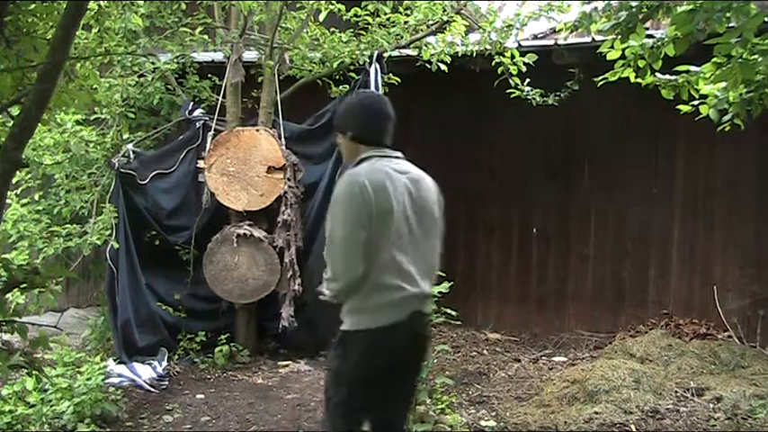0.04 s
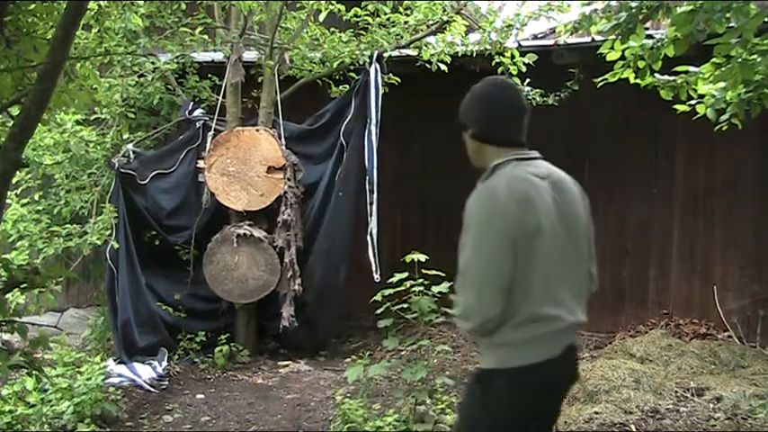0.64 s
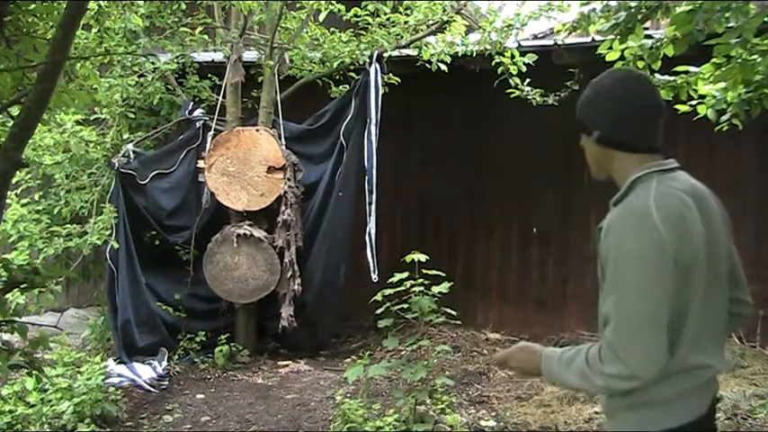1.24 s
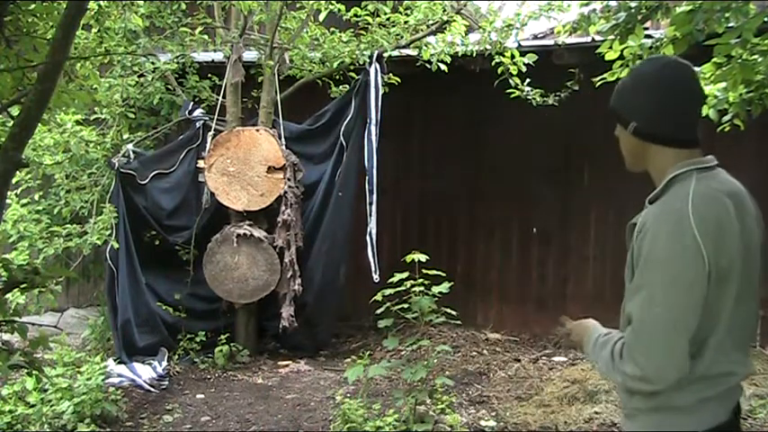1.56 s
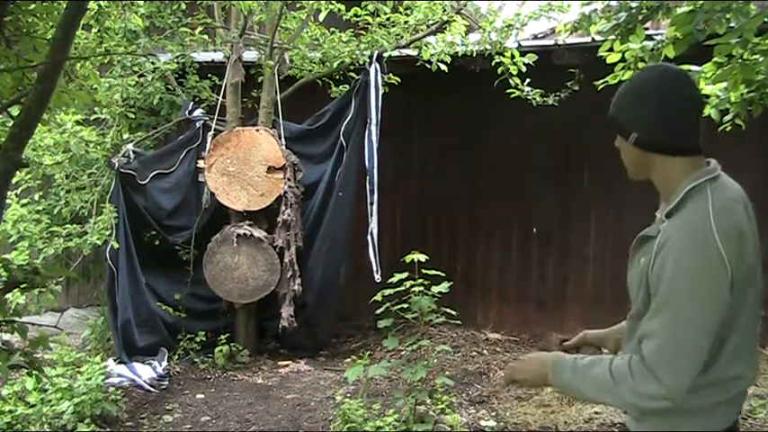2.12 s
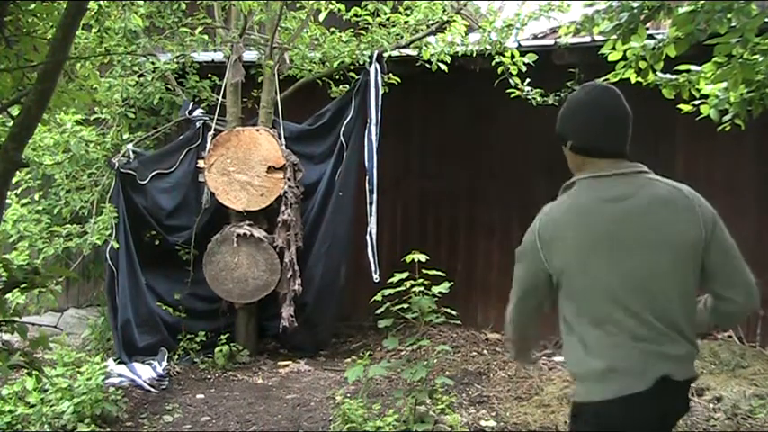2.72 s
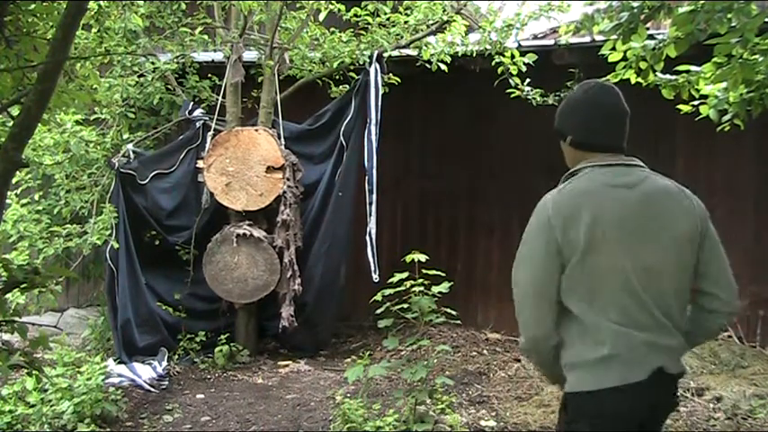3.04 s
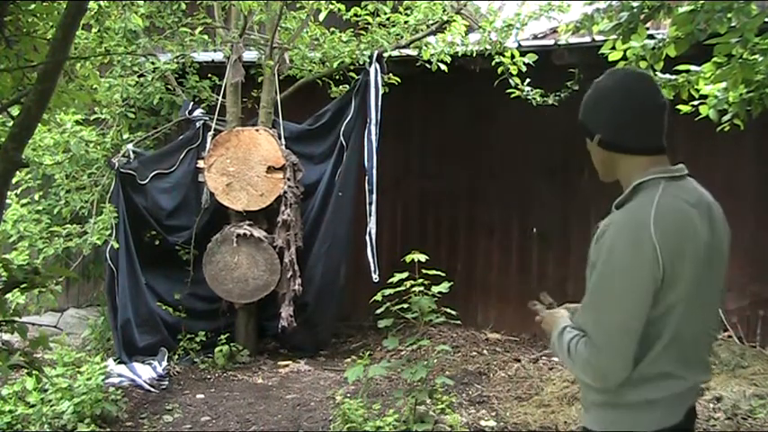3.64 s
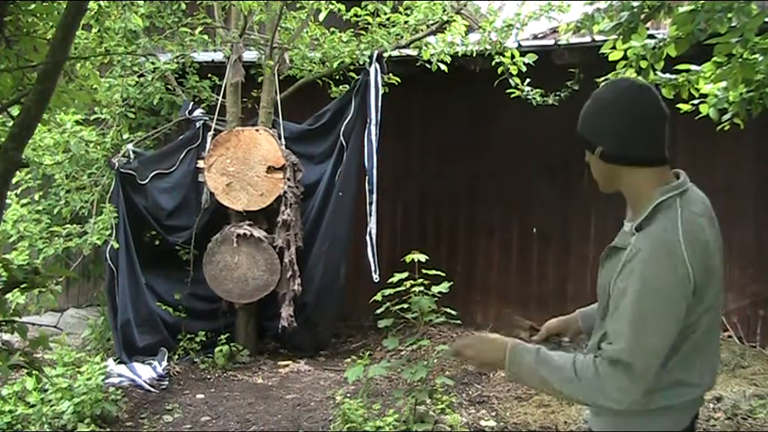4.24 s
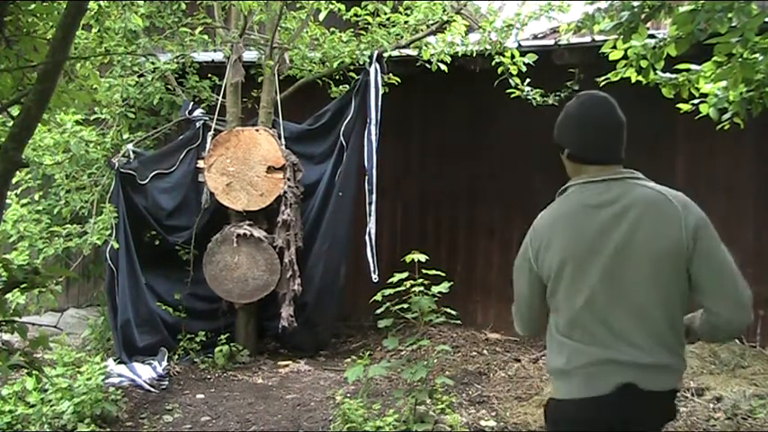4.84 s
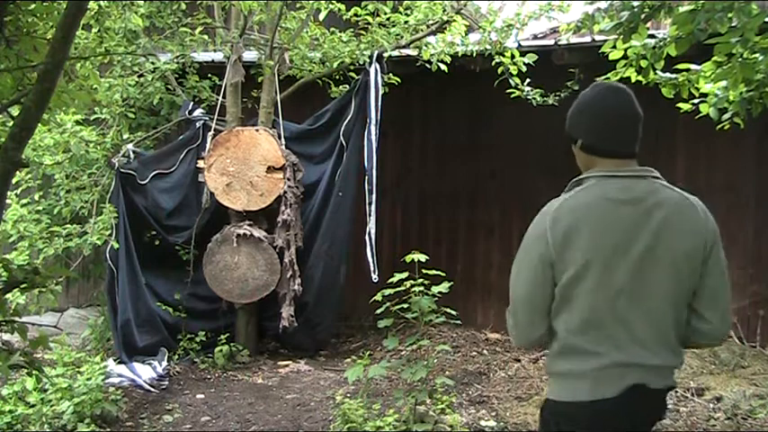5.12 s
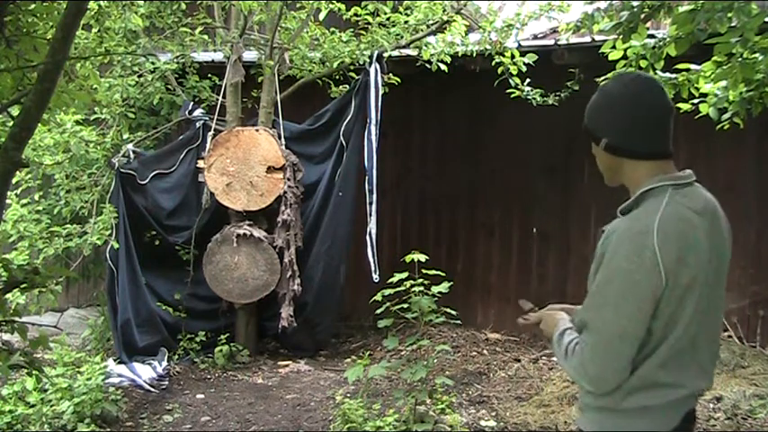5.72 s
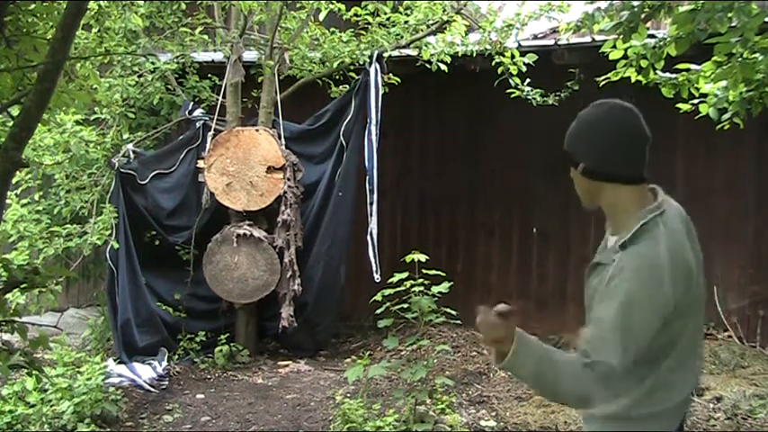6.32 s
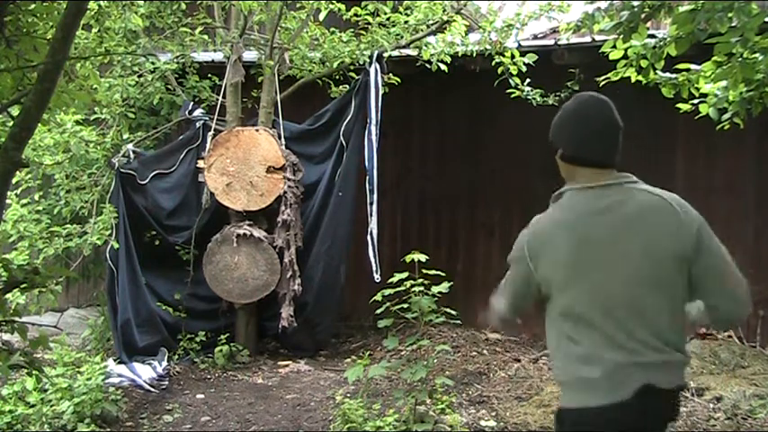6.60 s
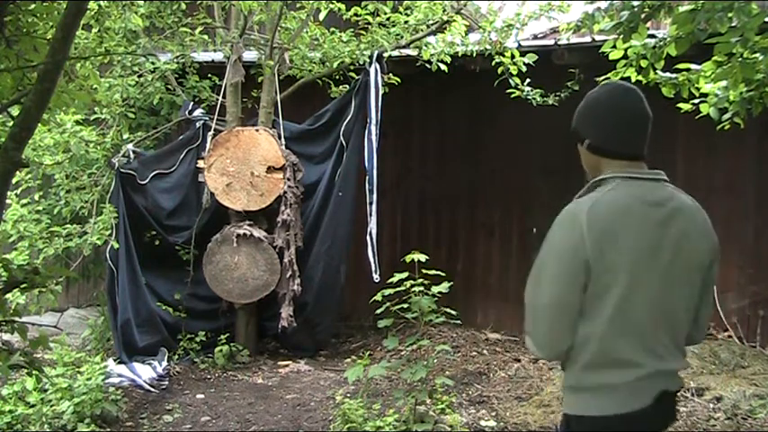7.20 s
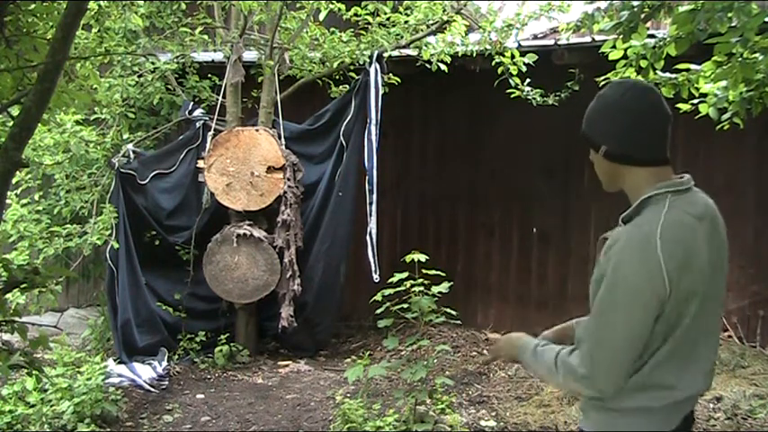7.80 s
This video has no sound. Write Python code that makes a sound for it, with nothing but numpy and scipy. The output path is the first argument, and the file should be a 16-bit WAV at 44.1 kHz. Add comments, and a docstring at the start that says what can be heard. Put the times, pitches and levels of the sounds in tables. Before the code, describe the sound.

A quiet outdoor yard, with a faint steady hush of distant traffic and leaves and a barely audible engine drone coming and going. During the first second, spare knives clink lightly close to the microphone while footsteps crunch over dry litter and clothing rustles; two twigs snap around 1.3 seconds. At 2.8 seconds a thrown knife bites into a log straight ahead with a loud, sharp, splintering crack and a short wooden thud. Twigs snap underfoot just after 3 seconds. Two more knives strike at 4.8 and 6.7 seconds, the last the loudest. Each hit echoes briefly off a fence and walls, with a very faint quiver of the blade. Sleeves swish softly around every throw, and a quiet step follows. A blackbird whistles in the trees, mostly in the first second and from 4.5 to 6.2 seconds, and a smaller bird adds faint chips.

```python
"""Knife throwing in a leafy yard

Ahead of a close pair of microphones, three thrown knives bite into a hanging log round: fibres tear,
the wood thuds, the blade quivers, and a fence and farther walls throw each crack back. Close by, the
thrower steps over dry litter, his sleeves swish and the spare knives clink in his hand. Beyond, a
blackbird and a smaller bird sing in the trees over the hush of distant traffic and one droning engine."""
import sys
import numpy as np
from scipy import signal
from scipy.fft import rfft, irfft, next_fast_len
from scipy.io import wavfile

SR = 44100
rng = np.random.default_rng(int(sys.argv[2]) if len(sys.argv) > 2 else 0)


def to_wav(sig):
    """Store sig (one row per channel, or 1-D mono) as 16-bit WAV at the path in sys.argv[1].

    Samples outside -1..1 are clipped; the rate is SR.
    """
    pcm = np.clip(np.atleast_2d(sig), -1, 1) * 32767
    pcm = np.round(pcm).astype(np.int16)
    wavfile.write(sys.argv[1], SR, pcm.T)  # frames by channels


N = 346626
T = np.arange(N) / SR
RING_T = T[:SR // 2]


def undb(db):
    """Decibels to gain."""
    return 10 ** (np.asarray(db) / 20)


def unit(x):
    """Scale to rms 1."""
    return x / np.sqrt(np.mean(x ** 2))


def over_bins(points):
    """Spread (frequency [Hz], value) points over the bins of a full-length spectrum."""
    return np.interp(np.fft.rfftfreq(N, 1 / SR), *np.transpose(points))


def colour(x, points):
    """Causal filter through (frequency [Hz], level [dB]) points; white noise keeps its power."""
    size = next_fast_len(len(x) + 2048, True) // 2 * 2
    octave = np.log2(np.maximum(np.fft.rfftfreq(size, 1 / SR), 1))
    hz, db = np.transpose(points)
    gain = unit(undb(np.interp(octave, np.log2(hz), db)))
    cepstrum = irfft(np.log(gain))
    cepstrum[1:size // 2] *= 2  # fold to minimum phase
    cepstrum[size // 2 + 1:] = 0
    return irfft(rfft(x, size) * np.exp(rfft(cepstrum)))[:len(x)]


def band(x, low_hz, high_hz, order=2):
    """Band-pass between two edges."""
    return signal.sosfilt(signal.butter(order, [low_hz, high_hz], "band", fs=SR, output="sos"), x)


def fade(t60):
    """Exponential decay, 60 dB down after t60 seconds."""
    return np.exp(-np.log(1000) * RING_T / t60)


def swell(s, db, rise_s, decay_s):
    """Gain that grows to a peak at time s and dies away."""
    return undb(db) * np.exp(np.minimum((T - s) / rise_s, (s - T) / decay_s))


def ring(modes):
    """Impulse response of (frequency [Hz], level [dB], t60 [s]) modes."""
    return sum(undb(db) * fade(t60) * np.sin(2 * np.pi * hz * RING_T) for hz, db, t60 in modes)


def burst(decay_s):
    """Dying noise of unit energy."""
    x = rng.standard_normal(len(RING_T)) * np.exp(-RING_T / decay_s)
    return x / np.linalg.norm(x)


def grains(spread_db):
    """Dense clicks of very uneven size, rms 1."""
    noise = rng.standard_normal(N)
    sizes = np.minimum(rng.exponential(size=N // 32 + 1), 5)
    return unit(noise * undb(spread_db * np.repeat(sizes, 32)[:N]))


def add(track, s, x):
    """Mix a sound into a track at time s."""
    i = max(int(s * SR), 0)
    track[i:i + len(x)] += x[:N - i]


def through(x, response):
    """Convolve, keeping the length."""
    return signal.fftconvolve(x, response)[:len(x)]


def stereo(mid, side, pan_db):
    """Mid and side to left and right; a positive pan leans left."""
    return np.array([(mid + side) * undb(pan_db / 2), (mid - side) * undb(-pan_db / 2)])


# trunks, fence and leaves around the microphones: (low edge [Hz], high edge [Hz],
# relative early level [dB], early t60 [s], relative late level [dB], late t60 [s])
YARD_SCATTER = [(59.7, 750, -9, .12, -11.5, 0.54), (690, 2390, -4, 0.11, -15.5, 1),
                (3210, 6400, -4.5, 0.23, -18, 0.55), (6700, 10800, -1.5, 0.18, -24, 0.11)]
def scatter(early_db, late_db):
    """Quick reflections from nearby and a faint long tail, without the direct sound."""
    t = T[:SR]
    onset = 1 - np.exp(-(t / 0.00068) ** 2)
    out = np.zeros(SR)
    for low_hz, high_hz, near_db, near_t60, far_db, far_t60 in YARD_SCATTER:
        for db, t60 in ((near_db + early_db, near_t60), (far_db + late_db, far_t60)):
            shape = np.exp(-np.log(1000) * t / t60) * onset
            tail = rng.standard_normal(SR) * shape / np.linalg.norm(shape)
            out += undb(db) * band(tail, low_hz, high_hz)
    return out


def yard(x, pan_db, early_db, late_db, width_hz):
    """Place a source before the close pair: reflections differ between the two mostly in the treble."""
    mid = x + through(x, scatter(early_db, late_db))
    highpass = signal.butter(1, width_hz, "high", fs=SR)
    side = through(x, signal.lfilter(*highpass, scatter(early_db, late_db)))
    return stereo(mid, side, pan_db)


# distant traffic and leaves, as they reach the yard: (frequency [Hz], relative level [dB])
HUSH_SPECTRUM = [(15, -37), (25, -15), (53, 0), (129, -4), (188, -5), (221, -7.5), (305, -6), (410, -8),
                 (722, -4), (1950, -12), (2120, -15.5), (2300, -15), (2560, -17.5), (3720, -21),
                 (15500, -45)]
# their width across the pair: (frequency [Hz], relative side level [dB])
HUSH_WIDTH = [(60, -6), (110, -3), (200, 1), (380, 1), (700, -4.5), (1290, -3.5), (2380, -0.5), (4400, 1.5),
              (8120, 4.5), (15000, 6.5)]
def traffic_and_leaves(level_db=-53, recede_db_per_s=-0.3574, waver_db=1.17, rumble_db=2.5):
    """Far traffic, slowly receding, and foliage: the rumble swells and sinks, the hush hardly moves."""
    def hush():
        noise = colour(rng.standard_normal(N), HUSH_SPECTRUM)
        bass = signal.sosfilt(signal.butter(1, 150, fs=SR, output="sos"), noise)
        knots_s = np.linspace(0, T[-1], 70)
        sway, surge = (np.interp(T, knots_s, knots) for knots in rng.standard_normal((2, 70)))
        return bass * undb(rumble_db * surge) + (noise - bass) * undb(waver_db * sway)
    mid = hush()
    side = irfft(rfft(hush()) * undb(over_bins(HUSH_WIDTH) - 0.5), N)
    return undb(level_db + recede_db_per_s * T) * stereo(mid, side, pan_db=1.5)


# one engine far outside the yard: (time [s], frequency [Hz], level [dB])
ENGINE_COURSE = [(0, 58, -86), (1.35, 62, -58), (1.9, 62, -76), (2.6, 61, -57.5), (3.1, 63, -78),
                 (5.1, 72, -68), (6.1, 89, -60), (7, 91, -64), (7.86, 91, -76)]
def far_engine(unsteady=0.53):
    """Only the engine's lowest note carries this far, fading in and out."""
    times, *columns = np.transpose(ENGINE_COURSE)
    hz, db = (np.interp(T, times, column) for column in columns)
    fading = 1 + unsteady * unit(band(rng.standard_normal(N), 2.03, 5.7))
    return undb(db) * unit(fading * np.sin(2 * np.pi * np.cumsum(hz) / SR))


# the blackbird's notes, off in the trees: (time [s], length [s], start pitch [Hz], middle pitch [Hz],
# end pitch [Hz], relative level [dB], trill depth [Hz])
BLACKBIRD_NOTES = [(0, 0.056, 2864, 2710, 2670, -47.5, 186), (0.334, 0.074, 2350, 2260, 2090, -47, 51),
                   (0.416, 0.16, 2200, 2175, 2120, -45, 7), (0.623, 0.053, 1870, 1920, 1970, -51, 8),
                   (.7, 0.037, 3550, 3360, 3320, -44.5, 43), (1.325, 0.29, 2454, 2650, 3330, -57.5, 154),
                   (1.87, 0.098, 2500, 2550, 2620, -55.5, 156), (2.06, 0.062, 2150, 2140, 2140, -60, 56),
                   (2.433, 0.084, 2750, 2840, 2790, -62, 140), (4.533, .12, 2280, 2360, 2297, -48.5, 6),
                   (4.626, 0.081, 2340, 2066, 1645, -50, 13), (4.855, 0.11, 2020, 2013, 2000, -46.5, 13),
                   (5.149, 0.0836, 2735, 2874, 2775, -43.5, 14), (5.229, .06, 2546, 2490, 2430, -47, 18),
                   (5.244, 0.15, 2550, 2498, 2390, -50, 280), (5.668, 0.046, 1613, 1610, 1580, -57, 9.2),
                   (5.888, 0.1, 2900, 2243, 1850, -48.5, 26), (6.004, .14, 2007, 2555, 2547, -48.5, 264)]
# the smaller bird's chips, all one shape: (time [s], pitch [Hz], relative level [dB])
SMALL_BIRD_CHIPS = [(1.51, 4130, -64), (3.541, 3240, -62), (6.23, 7590, -61), (6.23, 4920, -63),
                    (6.28, 4390, -60), (6.306, 6650, -63.5), (6.33, 7620, -69), (6.399, 7440, -67),
                    (6.619, 4470, -57), (6.65, 3430, -57)]
def birds(trill_hz=62, flutter=0.294, canopy_db=-7, canopy_t60=0.69):
    """Gliding, trilled whistles and falling chips waver through the leaves and linger in the trees."""
    out = np.zeros(N)
    chip_s, fall_hz_per_s, chip_depth_hz = 0.031, 6100, 40
    half_fall_hz = fall_hz_per_s * chip_s / 2
    chips = [(s, chip_s, hz + half_fall_hz, hz, hz - half_fall_hz, db, chip_depth_hz)
             for s, hz, db in SMALL_BIRD_CHIPS]
    for s, length_s, start_hz, middle_hz, end_hz, db, depth_hz in BLACKBIRD_NOTES + chips:
        progress = np.linspace(0, 1, int(length_s * SR))
        waver = 1 + flutter * unit(band(rng.standard_normal(SR), 13.2, 71.3))[-len(progress):]
        trill = depth_hz * np.sin(2 * np.pi * np.cumsum(trill_hz * waver) / SR)
        glide = np.polyval(np.polyfit([0, .5, 1], [start_hz, middle_hz, end_hz], 2), progress)
        effort = np.abs(np.sin(np.pi * progress)) ** 0.21 * waver
        add(out, s, undb(db) * unit(effort * np.sin(2 * np.pi * np.cumsum(glide + trill) / SR)))
    near = yard(out, pan_db=2.5, early_db=4, late_db=12, width_hz=3400)
    canopy = np.array([through(out, burst(canopy_t60 / np.log(1000))) for _ in near])
    return undb(-3) * (near + undb(canopy_db) * canopy)


# sleeves close by, alike in every throw (wind-up, follow-through, turning back):
# (time after the hit [s], level [dB], rise [s], decay [s])
ARM_MOVES = [(-.27, -56, 0.18, 0.28), (-.08, -60, 0.083, .14), (.6, -63, 0.1, 0.18)]
# the next knife drawn from the hand: (time [s], level [dB])
KNIFE_DRAWS = [(3.405, -65), (5.907, -67)]
def sleeves_and_fingers(walk_db=-57, walk_db_per_s=-10, walk_end_s=1.07, stop_s=.15, standing_db=-75):
    """Fleece rubs on the walk to the mark and in each throw; a blade hisses over the fingers."""
    walking = undb(walk_db + walk_db_per_s * T) * np.exp(-np.maximum(T - walk_end_s, 0) / stop_s)
    moves = [swell(s + after_s, db, rise_s, decay_s)
             for s, *_ in KNIFE_HITS for after_s, db, rise_s, decay_s in ARM_MOVES]
    rub = np.sqrt(undb(standing_db) ** 2 + walking ** 2 + sum(move ** 2 for move in moves))
    flight_s, release_db, half_slide_s = 0.251, -58.5, 0.019
    releases = [(s - flight_s, release_db) for s, *_ in KNIFE_HITS]
    slide = sum(undb(db) * np.exp(-((T - s) / half_slide_s) ** 2) for s, db in releases + KNIFE_DRAWS)
    return rub * fleece() + slide * unit(band(grains(1.5), 2300, 10000, order=1))


# fleece at close range: (frequency [Hz], relative level [dB])
FLEECE_SPECTRUM = [(300, -3), (1500, 8), (3000, 4), (5000, 1), (7000, -3), (10000, -14), (15000, -11.5)]
def fleece():
    """The steady, grainy rustle of cloth rubbing on cloth."""
    return colour(grains(1.8), FLEECE_SPECTRUM)


# twigs underfoot, near the microphones: (time [s], level [dB], decay [s])
TWIG_SNAPS = [(1.241, -40, 0.012), (1.317, -39, 0.0039), (2.9931, -33, 0.0032), (3.145, -47, .003),
              (3.2344, -37, 0.0029)]
# the tone of a snap: (frequency [Hz], relative level [dB])
TWIG_SPECTRUM = [(200, -14), (900, -7), (1500, 5), (2100, 0.5), (3000, -16), (5000, -13), (9000, -24),
                 (15000, -32)]
def twigs():
    """Now and then a twig snaps under a sole with a short, dry crack."""
    snaps = np.zeros(N)
    for s, db, decay_s in TWIG_SNAPS:
        add(snaps, s, undb(db) * unit(rng.standard_normal(len(RING_T))) * np.exp(-RING_T / decay_s))
    return colour(snaps, TWIG_SPECTRUM)


# the thrower's steps, close by: (time [s], level [dB], rise [s], heel relative to crunch [dB])
FOOTSTEPS = [(.11, -52, 0.022, -15), (0.189, -48, 0.053, -5), (.46, -61, 0.075, -14), (.9, -52, 0.13, -2),
             (1.06, -52, 0.065, -25), (1.25, -46, 0.016, -3), (3.06, -61.5, .13, -2)]
# dry litter on the yard floor: (frequency [Hz], relative level [dB])
LITTER_SPECTRUM = [(150, 1), (600, -7), (1800, 3.5), (3500, -1), (7000, -8.5), (10000, -25.5), (15000, -22)]
def feet(settle_s=0.065):
    """Each sole thuds softly and crushes dry leaves; one more step ends each throw."""
    after_hit_s, recover_db, recover_rise_s, recover_heel_db = 0.378, -56, 0.077, -4
    recoveries = [(s + after_hit_s, recover_db, recover_rise_s, recover_heel_db) for s, *_ in KNIFE_HITS]
    crush, heel = np.zeros((2, N))
    for s, db, rise_s, heel_db in FOOTSTEPS + recoveries:
        weight = swell(s, db, rise_s, settle_s)
        crush += weight
        heel += undb(heel_db) * weight
    crunch = crush * colour(grains(2.5), LITTER_SPECTRUM)
    return crunch + heel * unit(band(rng.standard_normal(N), 59, 780, order=1))


# spare knives touching in the hand, close by: (time [s], relative level [dB])
KNIFE_TOUCHES = [(.102, -39), (.459, -27), (.479, -32), (.828, -32), (1.007, -43.5), (1.035, -45),
                 (3.05, -50), (3.189, -50), (3.418, -50)]
# a free knife, before the hand damps it: (frequency [Hz], level [dB], t60 [s])
FREE_KNIFE_MODES = [(1890, -9.5, 0.15), (3486, -0.5, 0.066), (4000, -19, .1), (5300, 1.5, 0.085),
                    (5780, -9, 0.08), (6336, -11, .08), (6940, -13, 0.033), (7460, -3.5, 0.18),
                    (7300, -18, 0.13), (9850, -12, 0.2), (10460, -20, 0.13), (12800, -13, .07),
                    (14500, -19, 0.055)]
def clinks(scrape_s=0.017, detune=.018, hand_t60=0.079):
    """Steel scrapes briefly on steel and the loose blades ring, damped by the hand."""
    out = np.zeros(N)
    for s, db in KNIFE_TOUCHES:
        contact = burst(scrape_s)
        modes = np.tile(FREE_KNIFE_MODES, (2, 1))  # two blades meet, not quite alike
        modes[:, 0] *= 1 + detune * rng.standard_normal(len(modes))
        chime = through(contact, ring(modes) * fade(hand_t60))
        scrape = band(contact, 3200, 8000) + undb(-19) * band(contact, 8000, 16000)
        add(out, s, undb(db) * (undb(-10) * chime + undb(18.5) * scrape))
    return out


# the fence and walls, nearest first:
# (delay [s], level [dB], smear [s], band centre [Hz], reach above the centre [Hz])
WALL_ECHOES = [(.019, -17, 0.0022, 1240, 4000), (.1, -23, 0.004, 440, 1000), (0.123, -36, 0.024, 455, 70),
               (.196, -19.5, 0.0033, 1400, 900), (.249, -22, 0.00067, 1220, 400)]
def add_echoes(track, s, hit, far_echo_db, far_delay_s=.15):
    """Each wall returns the crack late, smeared and narrowed to a band."""
    for delay_s, db, smear_s, centre_hz, reach_hz in WALL_ECHOES:
        top_hz = centre_hz + reach_hz
        bounce = band(through(hit, burst(smear_s)), centre_hz ** 2 / top_hz, top_hz)
        is_far = delay_s > far_delay_s
        add(track, s + delay_s, undb(db + far_echo_db * is_far) * bounce)


# the log's heavily damped body: (frequency [Hz], level [dB], t60 [s])
LOG_MODES = [(176, -13, 0.025), (402, -14, 0.085), (448, -8, 0.076), (517, 1.5, 0.016), (670, -14, 0.038)]
# the stuck blade and the wood around it: (frequency [Hz], level [dB], t60 [s])
STUCK_BLADE_MODES = [(928, -7, 0.083), (1065, -5.5, 0.048), (1175, -31, 0.068), (1340, -10.5, 0.055),
                     (1584, -37, 0.13), (1620, -47, 0.0088), (2227, -19, 0.077), (2155, -7, 0.012),
                     (2510, -13, 0.039), (2900, -26, 0.011), (3520, -6, 0.018), (3640, -18, 0.018),
                     (5460, -28, 0.011)]
# the stuck knife quivering on: (frequency [Hz], level [dB], t60 [s])
QUIVER_MODES = [(446, -1, 0.24), (1314, -15, 0.33), (2470, 0.5, 0.36), (2556, -7, 0.76), (2610, 0, 0.33)]
# tearing wood fibres, one spectrum a throw: (frequency [Hz], relative level [dB])
SPLINTER_SPECTRA = [
    [(40, -18), (100, -12), (170, -2), (255, -10.5), (380, 6.5), (700, -6), (1050, 3), (1900, -2),
     (3000, -3.5), (4200, -11.5), (5300, -8.5), (6500, -23), (8200, -18), (10000, -32), (15000, -28)],
    [(40, -21), (100, -9), (190, -3), (260, -11.5), (400, 1.5), (750, -6), (1250, 4), (2100, -7.5),
     (3000, -11), (4400, -14.5), (6000, -37), (10000, -47), (15000, -42)],
    [(40, -42), (170, -31), (260, -26), (500, 2), (800, -6.5), (1300, 1), (2500, -4), (3300, -11.5),
     (4800, -17.5), (6400, -15.5), (8500, -29), (10000, -48), (15000, -36)],
]
# hits on the log, straight ahead; each part has its own gain: (time [s], level [dB], lag from tip to
# full blow [s], tip [dB], thud [dB], ring [dB], splinter [dB], quiver [dB], far echo [dB])
KNIFE_HITS = [(2.8051, -14, 0.00223, 12, -3, -2, 22, -49, -8),
              (4.8335, -10, 0.002, 3, 1.5, -3, 19.5, -35, -5),
              (6.711, -7, 0.001434, 12.5, 2.5, -12, 18.5, -35.5, -1.5)]
def knife_hits(radiate_hz=290):
    """The tip ticks in, the blade wedges and kicks the log, fibres tear and the knife quivers."""
    out = np.zeros(N)
    bass_loss = signal.butter(2, radiate_hz, "high", fs=SR, output="sos")  # the round is small
    for throw, spectrum in zip(KNIFE_HITS, SPLINTER_SPECTRA):
        s, db, lag_s, tip_db, thud_db, ring_db, splinter_db, quiver_db, far_echo_db = throw
        tip = undb(tip_db + 4) * band(burst(0.00061), 2180, 3240, order=1)
        fibres = undb(splinter_db) * colour(burst(0.0062), spectrum)
        quiver = undb(quiver_db) * ring(QUIVER_MODES)
        thud = undb(thud_db) * ring(LOG_MODES)
        blade = undb(ring_db) * ring(STUCK_BLADE_MODES)
        # the face is driven away first, so the pressure starts with a dip
        body = signal.sosfilt(bass_loss, quiver - thud - blade)
        blow = np.pad(fibres + body, (int(lag_s * SR), 0))[:len(body)]
        hit = undb(db) * (tip + blow)
        add(out, s, hit)
        add_echoes(out, s, hit, far_echo_db)
    return yard(out, pan_db=0, early_db=-4.5, late_db=-2.5, width_hz=4500)


def scene():
    """Target ahead, thrower close by, birds and traffic beyond and a little to the left."""
    movement = clinks() + twigs() + feet() + sleeves_and_fingers()
    thrower = yard(movement, pan_db=0, early_db=-7, late_db=3, width_hz=4600)
    return knife_hits() + thrower + birds() + traffic_and_leaves() + far_engine()


# mismatch of the microphone pair: (frequency [Hz], left minus right [dB])
PAIR_BALANCE = [(400, -3), (2000, -2.5), (4400, -2.5), (8000, -1.1), (13000, -2)]
def record(dry, lag_us=15, top_hz=15800):
    """Two slightly unlike microphones, the left a touch early; peaks are rounded and the top is cut."""
    lead = np.pi * np.fft.rfftfreq(N, 1 / SR) * lag_us / 10 ** 6
    mismatch = undb(over_bins(PAIR_BALANCE) / 2) * np.exp(1j * lead)
    heard = irfft(rfft(dry) * np.array([mismatch, 1 / mismatch]), N)
    rounded = np.tanh(.9 * heard) / 0.89
    return signal.sosfilt(signal.ellip(8, .2, 70, top_hz, fs=SR, output="sos"), rounded)


dry = scene()
out = record(dry)
to_wav(out)
```